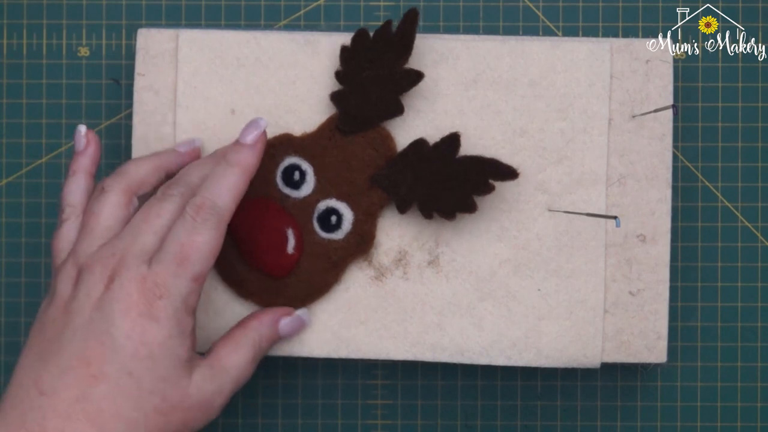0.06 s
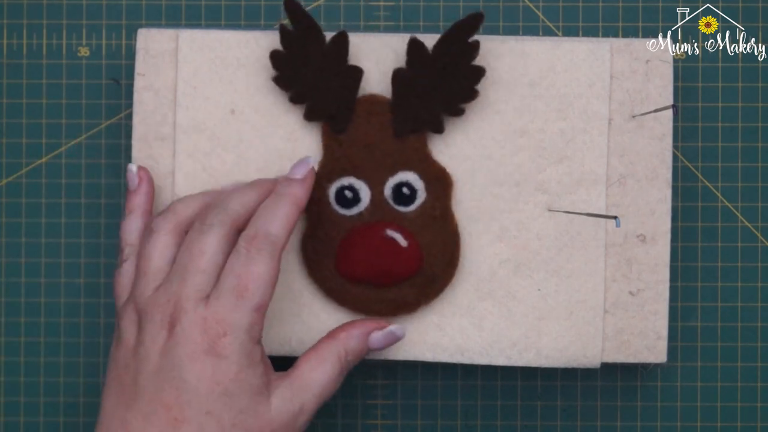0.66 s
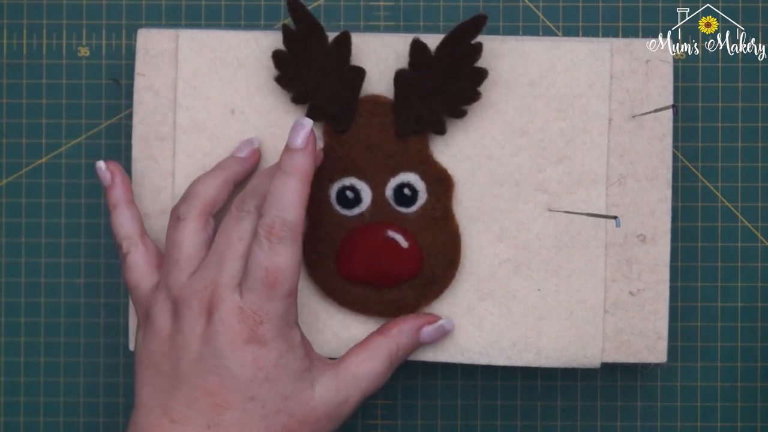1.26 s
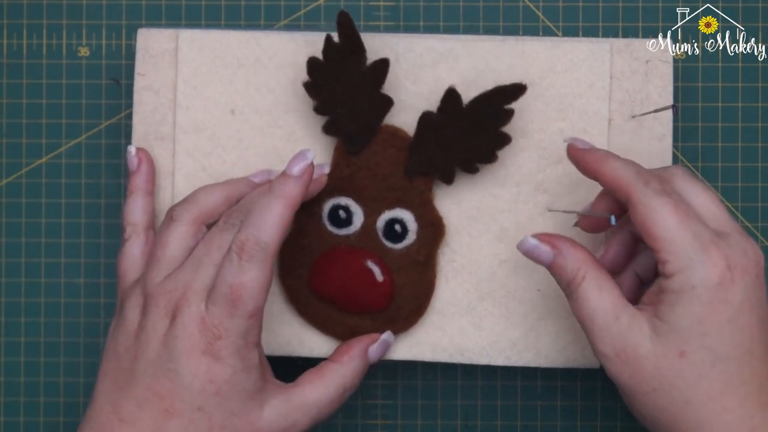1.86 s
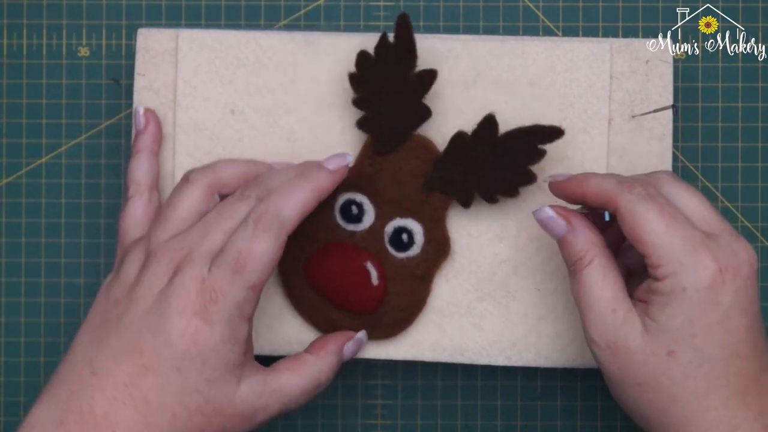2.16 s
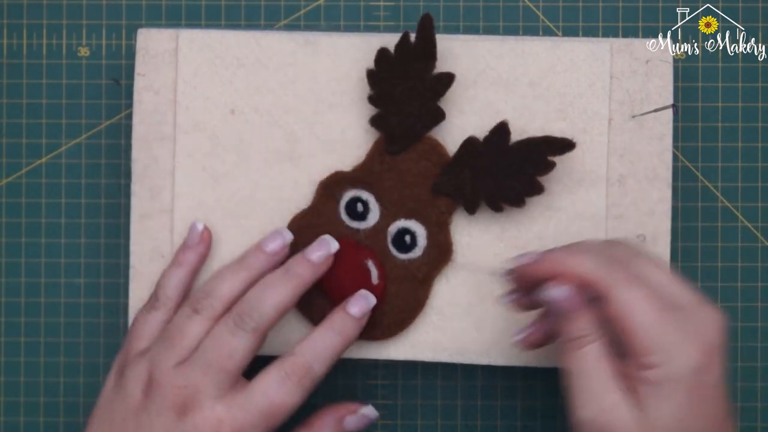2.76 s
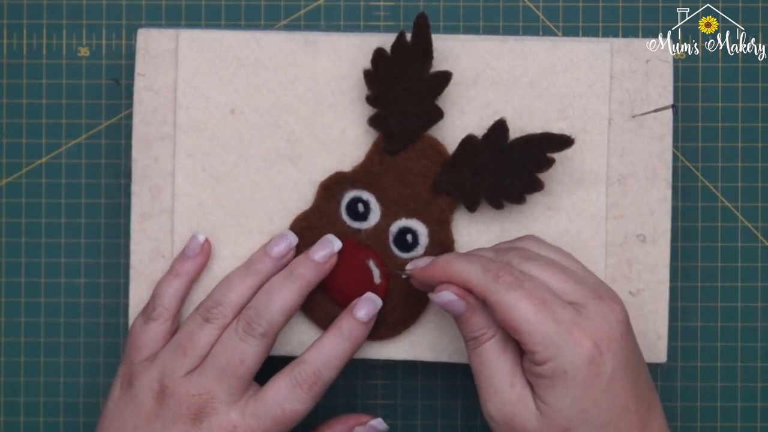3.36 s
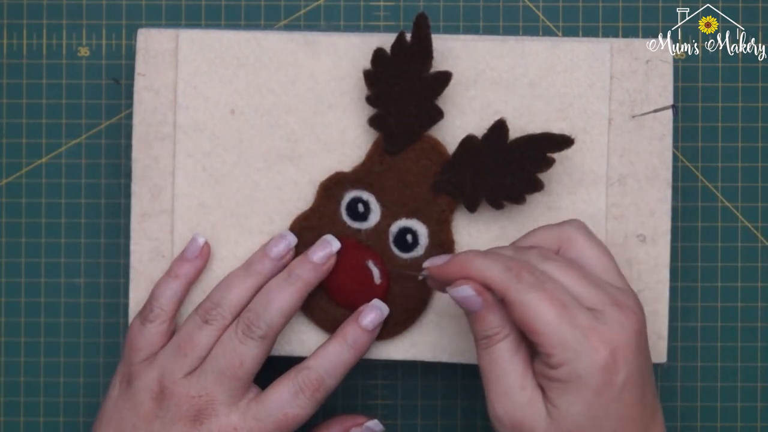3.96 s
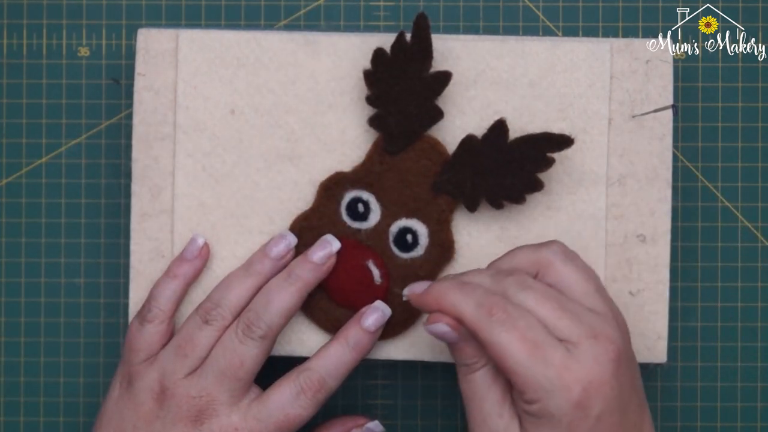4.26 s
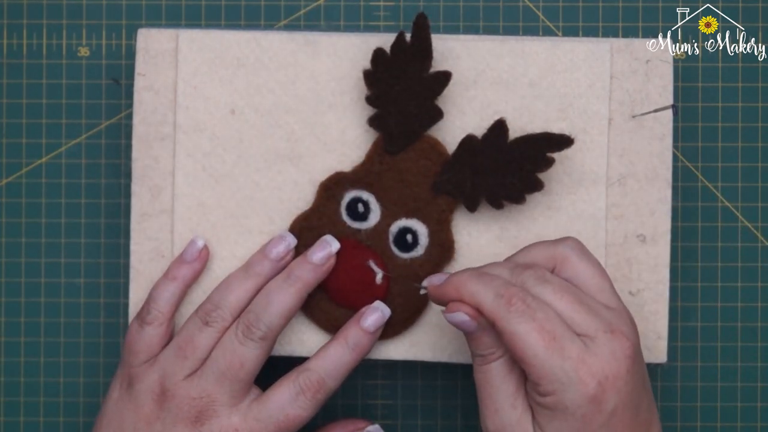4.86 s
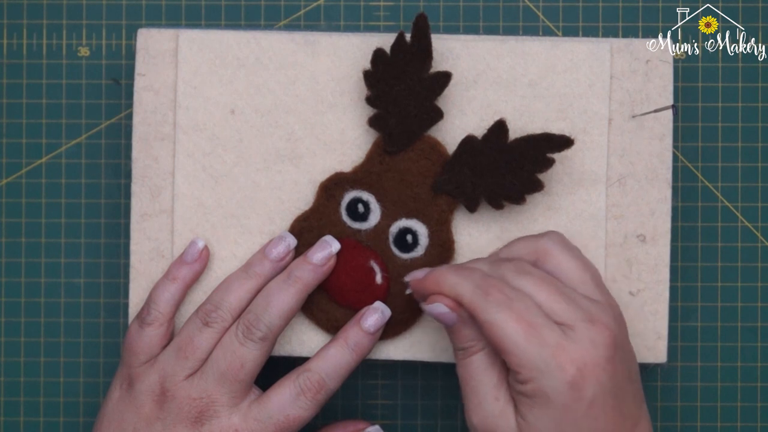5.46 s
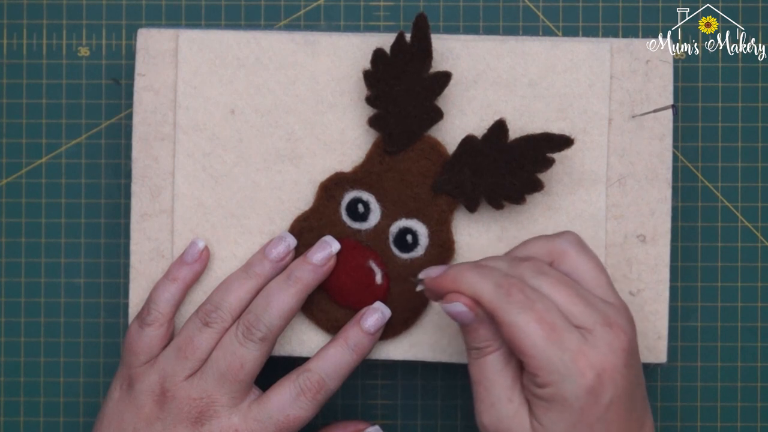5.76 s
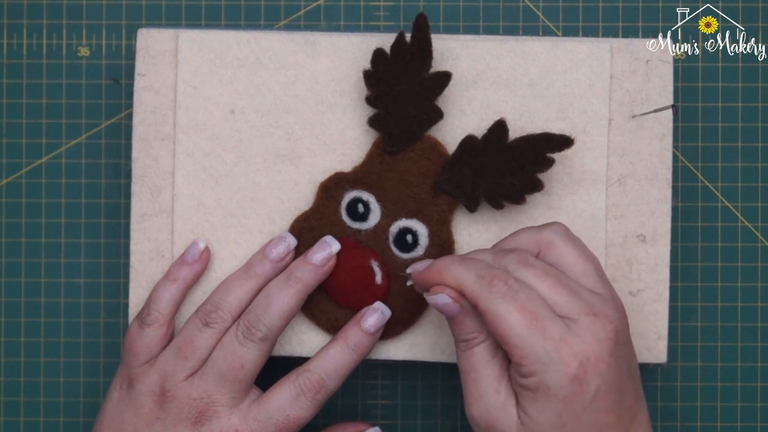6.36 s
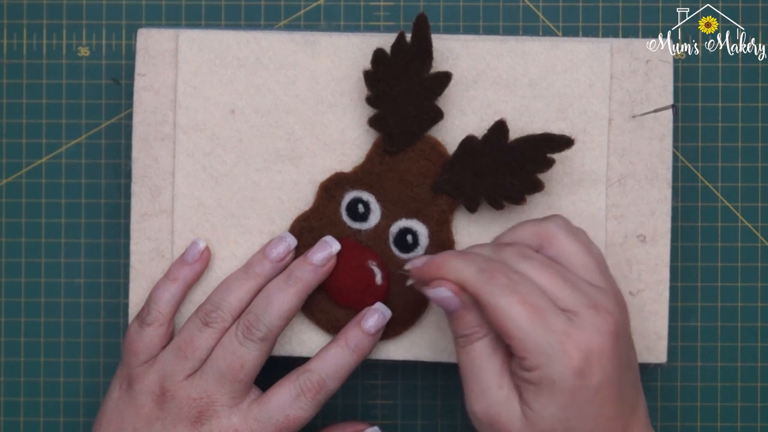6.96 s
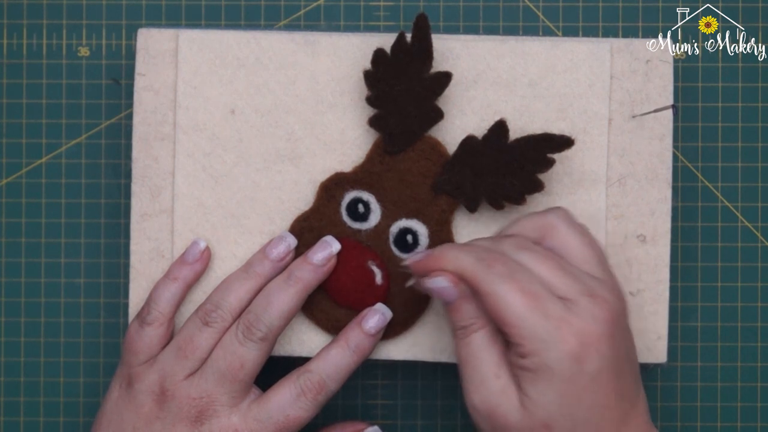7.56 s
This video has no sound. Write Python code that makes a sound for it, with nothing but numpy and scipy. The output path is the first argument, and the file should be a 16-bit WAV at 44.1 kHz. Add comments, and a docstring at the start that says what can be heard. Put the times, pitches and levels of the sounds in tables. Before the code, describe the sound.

Fingers rub softly over felt while a small tool, slightly to the right, clicks sharply, scrapes and lands on the table with a knock, the loudest sound. After a lull with faint rubbing, a barbed needle jabs wool on a foam pad in three short runs of soft, crunchy pops, about six a second. The needle is close to the microphone on the left, in a quiet room with a faint low rumble.

```python
"""Needle felting at a table

A barbed needle jabs wool on a foam pad in three runs, close to the left microphone in a quiet room.
Each jab is a crunch of snapping fibres, a pop at entry, a punch through and a soft hiss on the way out.
Before the jabs, a tool to the right clicks, slides and is put down; fingers rub over the felt.
The table sways and drones faintly under the hands."""
import sys
import numpy as np
from scipy import signal
from scipy.fft import rfft, irfft, next_fast_len
from scipy.io import wavfile
from scipy.ndimage import uniform_filter1d, map_coordinates

SR = 44100
rng = np.random.default_rng(int(sys.argv[2]) if len(sys.argv) > 2 else 0)


def log_audio(samples):
    """Write samples as a 16-bit WAV file to the path given in sys.argv[1]."""
    # one column per channel
    frames = np.atleast_2d(samples).T
    # limit to full scale, then quantise
    limited = np.clip(frames, -1, 1)
    pcm = np.round(limited * 32767).astype(np.int16)
    wavfile.write(sys.argv[1], SR, pcm)


N = 334804

# Event levels are relative; each source adds its own gain.
# A hand leans on the table. Each row: start in seconds, length in seconds, sway in dB.
LEANS = [(.02, .07, -61), (.25, 0.32, -57), (.75, .14, -54), (1.13, .06, -64), (1.4, 0.57, -66.5),
         (2.1, 1, -71), (3.23, 0.07, -58.5), (4.2, .35, -69), (4.62, 0.11, -60.5), (6.5, 0.39, -57.5),
         (7.14, 0.095, -55.5), (7.53, .06, -57)]
# Fingers on felt. Each row: start in seconds, length in seconds, hiss in dB, drone in dB.
RUBS = [(0.071, .08, -79, -72), (.24, 0.15, -62, -62), (0.517, 0.19, -67, -61), (0.803, 0.08, -66, -68.5),
        (1.378, 0.19, -75, -70), (1.65, .29, -71.5, -66), (2.037, .25, -71.5, -69), (2.508, 0.1, -73, -87),
        (2.868, 0.039, -84.5, -73), (3.23, 0.075, -97, -72), (4.38, .12, -92.5, -67.5),
        (4.648, 0.027, -85, -73), (6.825, 0.1, -88, -65.5)]
# Needle ticks. Each row: time in seconds, level in dB.
TICKS = [(0.2204, -41), (0.2295, -29), (1.8964, -39), (4.6487, -45), (4.6714, -46), (4.912, -53),
         (5.7882, -37.5), (6.694, -42)]
# Tool and fingernail clicks. Each row: time in seconds, level in dB, treble tilt in dB at 4 kHz.
CLICKS = [(0.2745, -15, 3), (0.277, -27, -2), (0.2809, -21.5, -8.5), (0.5088, -16.5, -2), (0.515, -22, -7),
          (0.5764, -52, 9), (0.876, -38, 11), (.914, -42.5, -21), (2.684, -47, 24), (4.454, -46.5, -20),
          (5.8754, -48.5, -23)]
# A tool is pushed over the table; the last row is a faint finger scratch.
# Each row: start in seconds, length in seconds, dull drag in dB, bright scrape in dB.
SCRAPES = [(0.292, 0.015, -46.5, -65.5), (0.329, 0.037, -58.5, -69), (0.475, .024, -51, -46.5),
           (0.505, 0.038, -49, -37.5), (0.575, .028, -42, -47.5), (.695, 0.043, -51.5, -70.5),
           (4.644, 0.023, -66, -83)]
# The tool lands and rocks. Each row: time in seconds, level in dB, hardness as a treble shelf in dB.
KNOCKS = [(.7160, -15, -17), (0.719, -8, 15), (0.726, -14, -2), (.7330, -14.5, 0), (.7410, -22, 6.5)]
# Needle jabs. Each row: entry in seconds, crunch in dB, rasp in dB, wait for the punch in seconds,
# punch in dB.
JABS = [(3.351, -66.5, 6, .017, -55.5), (3.537, -59, -.5, .023, -52.5), (3.7058, -55.5, 0, .003, -54),
        (3.894, -60, -3, .013, -46), (4.066, -56.5, 3, .008, -47), (5.019, -65.5, 2, .01, -67.5),
        (5.192, -54, 4, .0196, -42.5), (5.3495, -48, 6, .0264, -33), (5.515, -47, 5, .015, -35.5),
        (5.678, -52.5, 1, .0236, -44.5), (6.586, -52, 0, .009, -38.5), (6.763, -47.5, 0, .023, -41),
        (6.937, -52.5, 1.5, .02, -50), (7.113, -50.5, 3, .002, -43.5), (7.288, -52.5, -4.5, .0162, -40.5),
        (7.461, -52, 0, .014, -45)]

# Source spectra. Each row: frequency in Hz, relative level in dB.
FLOOR_SPECTRUM = [(25, -20), (50, -14), (75, -10.5), (110, -9.5), (150, -5), (240, -13), (340, -17),
                  (520, -21.5), (2400, -27.5), (5000, -33.5), (7500, -37.5), (9500, -34), (11500, -28.5),
                  (15800, -30.5)]
SWAY_SPECTRUM = [(20, -33.5), (38, -6.5), (51, 11), (64, -.5), (85, -9.5), (110, -6.5), (200, -50.5)]
DRONE_SPECTRUM = [(80, -26), (150, 5), (200, -4.5), (270, -8), (340, 10.5), (395, -10.5), (520, -13.5),
                  (1000, -45.5)]
SKIN_SPECTRUM = [(500, -6), (1500, -12), (2800, -4), (4000, -9.5), (6500, -8), (8400, 1), (9800, -4.5),
                 (11500, -4.5), (15500, -18.5)]
STEEL_SPECTRUM = [(1000, -11), (2800, -8.5), (4500, -26.5), (9000, 3.5), (12000, -11.5), (16000, -25)]
CLICK_SPECTRUM = [(120, -58), (200, -23), (618, -8.5), (1070, -19.5), (1400, -2.5), (2700, -5.5),
                  (3480, -13), (4180, -10), (5200, -25.5), (8820, -28), (9830, -34), (12200, -29.5),
                  (15500, -35.5)]
DRAG_SPECTRUM = [(300, -19), (900, -5.5), (1500, -9.5), (2300, 1), (3100, -5), (4500, -8.5), (6500, -15.5),
                 (15000, -21)]
SCRAPE_SPECTRUM = [(300, -16.5), (700, -9), (1200, -15.5), (2100, 0), (3000, -4.5), (4000, -7.5),
                   (5500, -12.5), (8500, -9.5), (12000, -10.5), (15800, -15)]
THUD_SPECTRUM = [(20, -53), (40, -27), (90, -12), (170, -5), (330, -6.5), (520, -3.5), (800, 0), (1030, -9),
                 (1270, 0), (1600, -14), (2100, -7.5), (2700, -10.5), (3100, -22.5), (4400, -19.5),
                 (6300, -31), (8700, -30), (15500, -43)]
WOOL_SPECTRUM = [(20, -38), (60, -15.5), (260, -5.5), (430, 0.5), (820, 0), (1200, -11.5), (1600, -7),
                 (2050, -21), (2600, -18.5), (3700, -19), (4600, -23), (6600, -22.5), (8500, -11),
                 (10200, -9), (12500, -15), (16000, -23.5)]
PULL_SPECTRUM = [(1000, -7), (3000, -16), (6000, -16), (8500, -5), (10500, -6.5), (13000, -6.5),
                 (16000, -4)]
# Band where packed fibres rasp. Each row: frequency in Hz, share of the jab's rasp gain.
RASP_BAND = [(2000, 0), (2600, 1), (3800, 0.98), (4800, 0)]
# Modes of the table, and of the pad on it. Each row: frequency in Hz, level in dB, T60 in seconds.
TABLE_MODES = [(97.7, -7, 0.2), (186, -5, .12), (242, -8.5, .14), (324, 1.5, .1), (362, 3, 0.095),
               (436.5, -7.5, 0.13), (620, -8.5, .12), (760, -10.5, .1), (1130, -11, .06), (1304, -1.5, .06),
               (2150, -10, .035), (2720, -18, 0.068)]
PAD_MODES = [(181.7, 6.5, 0.12), (354, -4, 0.15), (450, 3, 0.07), (788, -4.5, 0.054), (886, -3, 0.018),
             (1175, -9, 0.17), (1583, -17, .08)]
# Needle at the right microphone against the left. Each row: frequency in Hz, gain in dB.
RIGHT_SHADOW = [(200, -7), (700, -7.5), (1500, -8), (3500, -13), (9000, -17.5)]
# Room decay. Each row: frequency in Hz, T60 in seconds.
ROOM_T60 = [(150, 0.42), (500, 0.31), (2500, 0.34), (9000, 0.446), (15000, 1)]
# Wall reflections. Each row: frequency in Hz, gain in dB.
WALL_GAIN = [(200, -3.5), (800, -9), (2500, -9.5), (9000, -14), (15000, -20)]

RUB_RISE_S, RUB_FALL_S = 0.042, 0.06
JAB_S = 0.031  # inward stroke
DEEPEST_JAB_DB = max(row[1] for row in JABS)


def amp(db):
    """Decibels to gain."""
    return 10 ** (np.asarray(db) / 20)


def unit(x):
    """x at rms 1."""
    return x / np.sqrt(np.mean(x ** 2) + 1e-20)


def along(points, hz):
    """Interpolate (Hz, value) points on a log axis."""
    knots_hz, values = np.transpose(points)
    return np.interp(np.log(hz + 1), np.log(knots_hz + 1), values)


def filtered(x, response):
    """x through a complex frequency response."""
    size = next_fast_len(x.shape[-1] + SR // 4)
    return irfft(rfft(x, size) * response(np.fft.rfftfreq(size, 1 / SR)), size)[..., :x.shape[-1]]


def add(track, start_s, sound):
    """Mix a sound into a track."""
    part = track[..., max(round(start_s * SR), 0):][..., :sound.shape[-1]]
    part += sound[..., :part.shape[-1]]


def impulse(spectrum, size=2048):
    """Minimum-phase pulse with this spectrum, energy 1."""
    cepstrum = irfft(np.log(amp(along(spectrum, np.fft.rfftfreq(size, 1 / SR)))))
    cepstrum[1:size // 2] *= 2
    cepstrum[size // 2 + 1:] = 0
    pulse = irfft(np.exp(rfft(cepstrum)))
    return pulse / np.linalg.norm(pulse)


def noise(spectrum, correlation):
    """Coloured stereo noise, rms 1."""
    mid, side = filtered(rng.standard_normal((2, N)), lambda hz: amp(along(spectrum, hz)))
    angle = np.arccos(correlation) / 2
    return unit(np.cos(angle) * mid + np.sin(angle) * np.array([side, -side]))


def steadied(x, window_s=0.14):
    """Noise with its slow swells evened out."""
    power = uniform_filter1d(np.mean(x ** 2, axis=0), int(window_s * SR))
    return x / np.sqrt(np.abs(power) + 1e-9)


def wobble(rate_hz):
    """Smooth random curve."""
    knots = rng.standard_normal(int(N * rate_hz / SR) + 4)
    return map_coordinates(knots, [np.arange(N) * rate_hz / SR])


def pan(left_db):
    """Channel gains for a level lead on the left."""
    return amp([[left_db / 2], [-left_db / 2]])


def swells(rows, rise_s, fall_s):
    """Envelope of (start s, length s, dB) gestures: each rises, holds and fades."""
    t, power = np.arange(N) / SR, np.zeros(N)
    for start_s, length_s, db in rows:
        away = np.maximum(start_s - t, 0) / rise_s + np.maximum(t - start_s - length_s, 0) / fall_s
        power += (amp(db) * np.exp(-np.minimum(away, 20))) ** 2
    return np.sqrt(power)


def stroke(length_s, edge):
    """Hand speed: a bell over three lengths, above one half in the middle one."""
    return 1 / (1 + np.abs(np.linspace(-3, 3, int(3 * length_s * SR))) ** edge)


def scatter(t60_s):
    """Dense stereo reflections off the table and nearby things."""
    t = np.arange(SR // 8) / SR
    burst = rng.standard_normal((2, len(t))) * amp(-60 * t / t60_s)
    return burst / np.linalg.norm(burst[0])


def ring(modes, rise_s=0.00061):
    """Struck modes: a sum of decaying sines."""
    t = np.arange(SR // 2) / SR
    hz, db, t60_s = np.transpose(modes)[:, :, None]
    envelopes = amp(db - 60 * t / t60_s) * (1 - np.exp(-t / rise_s))
    return np.sum(envelopes * np.sin(2 * np.pi * hz * t), axis=0)


def noise_floor(level_db=-69):
    """Steady faint rumble and hiss."""
    return amp(level_db) * noise(FLOOR_SPECTRUM, correlation=0.078) * pan(1.3)


def table_sway(gain_db=-1, rest_db=-76, jab_db=-58, follow=0.56, push_s=0.085):
    """The table sways under a leaning hand and under each jab, more for a deep one."""
    pushes = [(s, push_s, jab_db + follow * (db - DEEPEST_JAB_DB)) for s, db, *_ in JABS]
    weight = np.hypot(swells(LEANS + pushes, rise_s=0.055, fall_s=0.056), amp(rest_db))
    return amp(gain_db) * weight * steadied(noise(SWAY_SPECTRUM, correlation=0.89)) * pan(3)


def table_drone(gain_db=1, rest_db=-80.5, jab_db=-72.5):
    """Rubbing fingers and the jabbing hand make the table drone."""
    rubs = [(s, length_s, db) for s, length_s, _, db in RUBS]
    jabs = [(s, JAB_S, jab_db) for s, *_ in JABS]
    force = np.hypot(swells(rubs + jabs, RUB_RISE_S, RUB_FALL_S), amp(rest_db))
    return amp(gain_db) * force * steadied(noise(DRONE_SPECTRUM, correlation=1)) * pan(8.5)


def finger_rubs(gain_db=3, grain_db=1.5, waver_db=1):
    """Skin hisses over felt."""
    speed = swells([row[:3] for row in RUBS], RUB_RISE_S, RUB_FALL_S)
    grain = amp(grain_db * wobble(200) + waver_db * wobble(18))
    hiss = unit(grain * noise(SKIN_SPECTRUM, correlation=0.091))
    return amp(gain_db) * speed * hiss * pan(1)


def needle_ticks(gain_db=4):
    """The steel needle ticks thinly. Mono."""
    out = np.zeros(N)
    for s, db in TICKS:
        add(out, s, amp(db + gain_db) * np.convolve(scatter(t60_s=0.012)[0], impulse(STEEL_SPECTRUM)))
    return out


def hard_clicks(left_db=1, right_db=4, scatter_db=9, left_lag_s=0.00044):
    """Tool and fingernail contacts: a sharp pulse and its scatter off the table."""
    out = np.zeros((2, N))
    for s, db, tilt_db in CLICKS:
        pulse = impulse([(hz, level + 2 * tilt_db * hz / (hz + 4000)) for hz, level in CLICK_SPECTRUM])
        paths = amp(scatter_db) * scatter(t60_s=0.019)
        add(paths[0], left_lag_s, amp([left_db]))  # direct paths
        add(paths[1], 0, amp([right_db]))
        add(out, s, amp(db) * signal.fftconvolve(paths, pulse[None], axes=1))
    return out * pan(-2.2)


def scrapes(drag_db=-1, scrape_db=1, grain_db=1.5):
    """A tool is pushed over the table; later a finger scratches faintly."""
    strokes = np.zeros(N)
    for s, length_s, _, db in SCRAPES:
        add(strokes, s - length_s, amp(db + scrape_db) * stroke(length_s, edge=4))
    speed = swells([row[:3] for row in SCRAPES], rise_s=0.02, fall_s=0.021)
    drag = amp(drag_db) * speed * noise(DRAG_SPECTRUM, correlation=0.053)
    grain = unit(amp(grain_db * wobble(500)))
    scrape = strokes * noise(SCRAPE_SPECTRUM, correlation=0.04455)
    return grain * (drag + scrape) * pan(-1.9)


def tool_landing(ring_db=-20, thud_db=11, left_lag_s=0.0004):
    """The tool lands and rocks; each contact thuds and rings the table's modes."""
    out, tone = np.zeros((2, N)), ring(TABLE_MODES)
    for s, db, hard_db in KNOCKS:
        add(out[0], s + left_lag_s, amp(db + ring_db) * tone)
        add(out[1], s, amp(db + ring_db) * tone)
        pulse = impulse([(hz, level + hard_db * hz / (hz + 1000)) for hz, level in THUD_SPECTRUM])
        paths = scatter(t60_s=0.1)
        # long waves reach both microphones alike
        paths[0] += filtered(paths[1] - paths[0], lambda hz: 1 / (1 + (hz / 380) ** 6))
        add(out, s, amp(db + thud_db) * signal.fftconvolve(paths, pulse[None], axes=1))
    return out * pan(-1.1)


def wool_response(rasp_db, pad_db=-39):
    """One snap: a pulse through the wool and a brief ring of the pad."""
    response = amp(pad_db) * ring(PAD_MODES)
    add(response, 0, impulse([(hz, db + rasp_db * along(RASP_BAND, hz)) for hz, db in WOOL_SPECTRUM]))
    return response


def fibre_crunch(gain_db=-5, snaps_per_s=1100, spread_db=4.5, fuzz=0.45):
    """Barbs snap through fibres all along each jab. Mono."""
    out, speed = np.zeros(N), stroke(JAB_S, edge=3.6)
    size = len(speed)
    for entry_s, db, rasp_db, *_ in JABS:
        catches = rng.random(size) < snaps_per_s / SR
        snaps = rng.choice([-1, 1], size) * amp(spread_db * rng.standard_normal(size))
        fibres = unit(catches * snaps) + fuzz * rng.standard_normal(size)
        crunch = signal.fftconvolve(unit(speed * fibres), wool_response(rasp_db))
        add(out, entry_s - JAB_S, amp(db + gain_db) * crunch)
    return out


def needle_punches(gain_db=19, pop_db=-3.5, blunt_s=0.00003):
    """The point pops into the felt, then punches through; foam blunts both blows. Mono."""
    force = np.zeros(N)
    blow = np.exp(-np.arange(SR // 500) / SR / blunt_s)
    blow *= amp(gain_db) / blow.sum()
    for entry_s, crunch_db, _, wait_s, punch_db in JABS:
        add(force, entry_s, amp(crunch_db + pop_db) * blow)
        add(force, entry_s + wait_s, amp(punch_db) * blow)
    return signal.fftconvolve(force, wool_response(rasp_db=0))[:N]


def needle_withdrawal(wait_s=0.0055, length_s=0.05, pull_db=-64, follow=0.58, grain_db=2):
    """The needle slips back along the fibres with a soft hiss, louder after a deep jab."""
    speed = np.zeros(N)
    for entry_s, db, *_ in JABS:
        pull = amp(pull_db + follow * (db - DEEPEST_JAB_DB)) * stroke(length_s, edge=0.96)
        add(speed, entry_s + JAB_S + wait_s - length_s, pull)
    grain = amp(grain_db * wobble(620))
    return speed * unit(grain * noise(PULL_SPECTRUM, correlation=0.032)) * pan(9)


def room(x, delay_s=0.0032, build_s=0.0025, stretches=24):
    """Wall reflections, with a fresh random tail for each stretch of sound."""
    out = np.zeros((2, N))
    for piece in np.array_split(np.arange(N), stretches):
        hz, t, bins = signal.stft(rng.standard_normal((2, SR // 2)), SR, nperseg=256)
        decay = amp(-60 * t / along(ROOM_T60, hz)[:, None])
        onset = 1 - np.exp(-np.maximum(t - delay_s, 0) / build_s)
        tail = signal.istft(bins * decay * onset, SR, nperseg=256)[1]
        tail /= np.linalg.norm(tail[0])
        add(out, piece[0] / SR, signal.fftconvolve(x[None, piece], tail, axes=1))
    return filtered(out, lambda hz: amp(along(WALL_GAIN, hz)))


def scene(right_lag_s=0.00016, room_send_db=-1):
    """Needle near the left microphone; tool farther off, to the right."""
    left = fibre_crunch() + needle_punches() + needle_ticks()
    right = filtered(left, lambda hz: amp(along(RIGHT_SHADOW, hz))
                     * np.exp(-2j * np.pi * hz * right_lag_s))
    tool = hard_clicks() + tool_landing() + scrapes()
    ambience = room(amp(room_send_db) * (left + tool[0])) + noise_floor()
    needle = np.array([left, right]) + needle_withdrawal()
    return needle + tool + ambience + finger_rubs() + table_drone() + table_sway()


def record(dry, low_cut_hz=28, top_hz=15850):
    """Roll off the deepest bass; cut everything above the band limit."""
    return filtered(dry, lambda hz: (hz < top_hz) * (1 - 1 / (1 + (hz / low_cut_hz) ** 6)))


dry = scene()
out = record(dry)
log_audio(out)
```